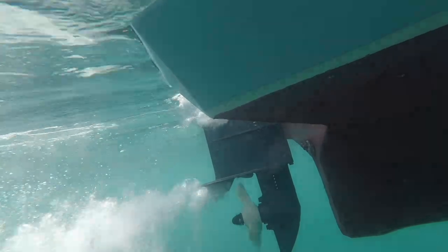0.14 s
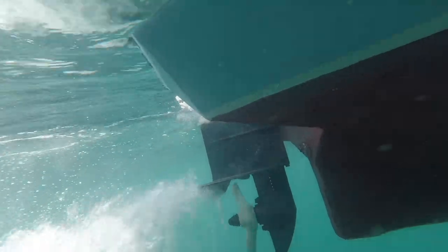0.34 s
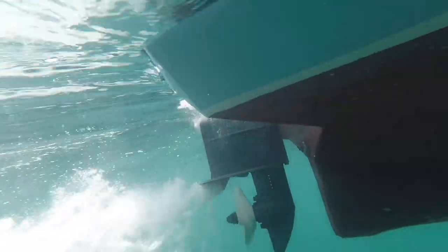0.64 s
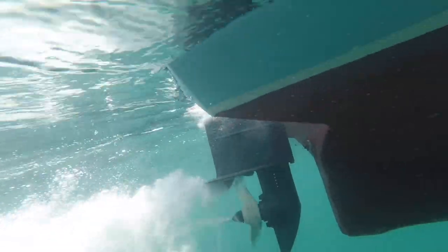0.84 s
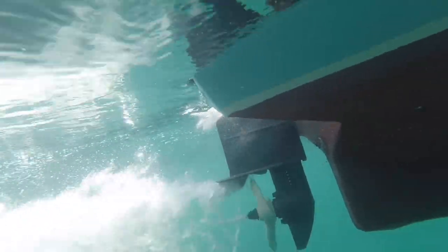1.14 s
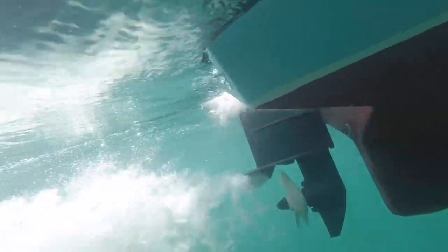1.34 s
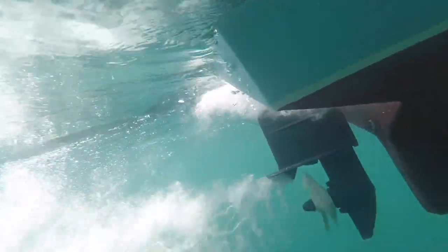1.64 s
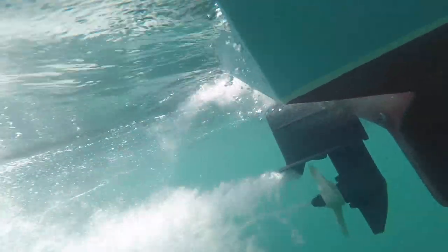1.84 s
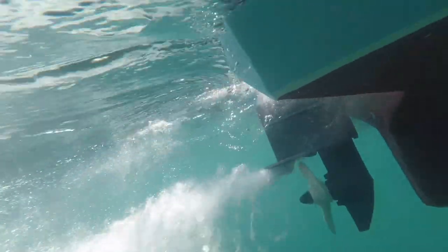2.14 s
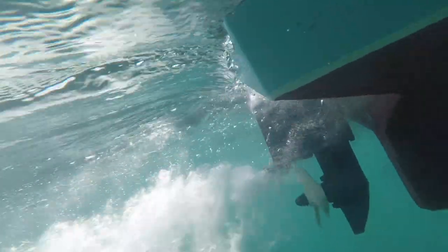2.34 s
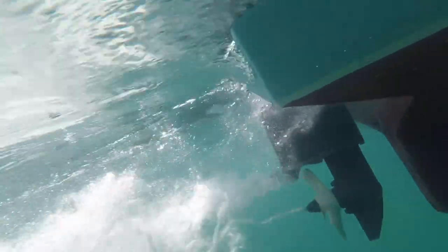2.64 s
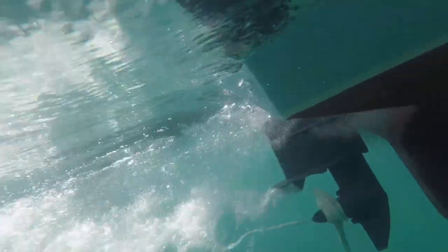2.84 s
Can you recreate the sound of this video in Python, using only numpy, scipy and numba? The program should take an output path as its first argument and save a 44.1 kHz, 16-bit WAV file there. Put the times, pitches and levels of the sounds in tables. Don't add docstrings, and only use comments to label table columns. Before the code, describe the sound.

An outboard motor drones underwater, its muffled throb swelling with bubbling wash, then suddenly slowing down.

```python
import sys
import numpy as np
from scipy import signal
from scipy.io import wavfile
from scipy.ndimage import uniform_filter1d, minimum_filter1d
from numba import njit

SR = 44100
rng = np.random.default_rng(int(sys.argv[2]) if len(sys.argv) > 2 else 0)


def bounce(signal):
    frames = np.transpose(np.atleast_2d(signal))
    limited = np.clip(frames, -1, 1)
    pcm = np.round(limited * 32767).astype(np.int16)
    wavfile.write(sys.argv[1], SR, pcm)


def how_loud(loudness_db):
    steps = np.asarray(loudness_db, float) / 20
    return 10 ** steps


N = 132300
TIME = np.arange(N) / SR


def unit(x):
    return x / np.sqrt(np.mean(x ** 2))


def curve(table, col):
    table = np.array(table, float)
    return np.interp(TIME, table[:, 0], table[:, col])


@njit
def svf(x, hz, width):
    y, b, l = np.empty(len(x)), 0., 0.
    for i in range(len(x)):
        g, k = np.tan(np.pi * hz[i] / SR), width / hz[i]
        v = (b + g * (x[i] - l)) / (1 + g * (g + k))
        b, l, y[i] = 2 * v - b, l + 2 * g * v, k * v
    return y


def ring(x, hz, width_hz):
    hz = hz + np.zeros(len(x))
    return svf(svf(x, hz, 1. * width_hz), hz, 1. * width_hz)


def smooth(x, size):
    return uniform_filter1d(uniform_filter1d(x, size), size)


def walk(rate):
    hold = int(SR / rate)
    steps = np.repeat(rng.standard_normal(N // hold + 1), hold)
    return unit(smooth(steps, hold)[:N])


def band(hz, width_hz):
    edges = np.clip([hz - width_hz / 2, hz + width_hz / 2], 1, SR / 2.2)
    sos = signal.butter(2, edges, "band", fs=SR, output="sos")
    return unit(signal.sosfilt(sos, rng.standard_normal(N)))


def bubbles(table, db, glide, rise, cycles=0):
    out = np.zeros(N)
    for s, peak_db, hz, *own in table:
        start = int(s * SR)
        n = own[0] if own else cycles
        length = min(int(1.6 * n / hz * SR), N - start)
        u = np.arange(length) / SR * hz / n
        shape = (1 - np.exp(-u / rise)) ** 2 * np.exp(-3 * u) * (1 - (u / 1.9) ** 4) ** 2
        tone = np.sin(2 * np.pi * n * u * (1 + glide * u))
        out[start:start + length] += how_loud(peak_db + db) * shape / shape.max() * tone
    return out


# (time [s], cycle rate [Hz])
ENGINE_SPEED = [(0, 22.35), (.16, 22.75), (.4, 23.4), (.64, 24.0), (.9, 24.5), (1.1, 25.15), (1.3, 25.25),
                (2.05, 25.3), (2.3, 24.75), (2.48, 24.8), (2.56, 23.1), (2.72, 18.6), (3, 18.3)]
# (time [s], level [dB])
WASH = [(0, -50.5), (.22, -51.5), (.6, -48.5), (1.0, -46), (1.25, -44), (1.6, -45.5), (1.95, -46.5),
        (2.2, -49.5), (2.55, -52), (2.64, -61), (3, -59.5)]
WASH_REF_DB = -48.5
# (time [s], low mode [Hz], low level [dB], high mode [Hz], high level [dB])
CLOUD_MODES = [(0, 153.9, -9, 160.5, -4.5), (.16, 143.5, -12, 155.3, -9.5), (.33, 147.3, -8, 161.7, -20.5),
               (.48, 123.5, -10, 132, -36.5), (.57, 139, -9, 172.5, -35), (.7, 123.4, -8.5, 175, -14),
               (.9, 130, -13, 169.2, -18), (1.08, 127, -16.5, 157.4, -12.5),
               (1.28, 120.8, -14.5, 155.2, -9.5), (1.48, 126, -38, 151.8, -10), (1.6, 116, -9, 169.7, -14),
               (1.74, 156.1, -10, 179.8, -21), (2.05, 157.7, -16, 172.5, -8),
               (2.32, 142, -10, 163.5, -10.5), (2.46, 152.3, -13, 167.5, -26.5),
               (2.56, 128, -9, 179, -37.5), (2.66, 133, -32.5, 166, -23.5), (2.82, 137, -26.5, 177, -17),
               (3, 152, -37.5, 166.8, -22.5)]
CLOUD_WIDTH_HZ, PUFF_SCATTER_DB, CYCLE_JITTER = 22.9, 1.56, .005
SECOND_PUFF, THROB_HZ, THROB_WIDTH_HZ, THROB_DB = 0.56, 59, 73, -26
SKIRT_HZ, SKIRT_WIDTH_HZ, SKIRT_DB = 233, 260, -33.5
LEAD_S, PUFF_START = .23, .5
WASH_LEAD = .6


def exhaust():
    lead = int(LEAD_S * SR)

    def early(x):
        return np.pad(x, (lead, 0), "edge")

    hz = early(curve(ENGINE_SPEED, col=1) * (1 + CYCLE_JITTER * walk(20)))
    turns = np.cumsum(hz) / SR + PUFF_START
    size = how_loud(PUFF_SCATTER_DB * rng.standard_normal(200))

    def puffs(phase):
        clicks = np.diff(np.floor(phase), prepend=np.floor(phase[0]))
        return clicks * size[phase.astype(int)] * SR / hz / np.sqrt(2)

    def cloud_mode(col):
        drive = first * how_loud(early(curve(CLOUD_MODES, col=col + 1)))
        return ring(drive, early(curve(CLOUD_MODES, col=col)), CLOUD_WIDTH_HZ)

    first = puffs(turns)
    low, high = cloud_mode(1), cloud_mode(3)
    both_cylinders = first + SECOND_PUFF * puffs(turns + .5)
    throb = unit(ring(both_cylinders, THROB_HZ, THROB_WIDTH_HZ)) * how_loud(THROB_DB)
    skirt = ring(ring(first, SKIRT_HZ, SKIRT_WIDTH_HZ), SKIRT_HZ, SKIRT_WIDTH_HZ)
    skirt = unit(skirt) * how_loud(SKIRT_DB)
    load = how_loud(0.78 * (early(curve(WASH, col=1)) - WASH_REF_DB))
    total = low - high + (throb + skirt) * load
    soft = uniform_filter1d(uniform_filter1d(total, size=40), size=32)
    return soft[lead:], turns[lead:] + WASH_LEAD


# (frequency [Hz], density [dB per Hz])
FLOW_SPECTRUM = [(20, -3.5), (90, 7), (200, 0.5), (340, -5), (500, -18.5), (860, -31), (1300, -35.5),
                 (2100, -35)]
FLOW_DB, FLOW_FOLLOWS, FLOW_GRAIN_DB = -19.5, 0.28, 1.5
SHELF_HZ = 2030


def colour_db(hz):
    table = np.array(FLOW_SPECTRUM, float)
    return np.interp(np.log(hz), np.log(table[:, 0]), table[:, 1]) + 10 * np.log10(hz / 340)


def flow(wash_db, turns):
    out, lumps = 0, walk(44.87)
    push_db = 1.4 * np.cos(2 * np.pi * turns)
    for hz in 20 * 2 ** np.arange(0, 7, 1 / 3):
        high = min(hz / 490.0, 1)
        lump_db = high * (FLOW_GRAIN_DB * lumps + push_db + 0.62 * wash_db) + walk(25)
        out = out + how_loud(colour_db(hz) + lump_db) * band(hz, hz / 3.76)
    out = signal.sosfilt(signal.ellip(5, 1, 40, SHELF_HZ, fs=SR, output="sos"), out)
    return unit(out) * how_loud(FLOW_DB + FLOW_FOLLOWS * wash_db)


# (centre [Hz], width [Hz], level [dB], share of the wash change [dB/dB], drift [1/s])
HOUSING_RINGS = [(680, 100, -48, 0.88, -0.023), (1048, 230, -49, 0.5, -0.088),
                 (1930, 130, -56.5, 0.97, -0.0026), (2300, 570, -65.5, 0.65, -0.032),
                 (3250, 2900, -68.5, 0.78, .02), (4906, 2500, -55.5, .9, 0.033),
                 (6070, 1500, -51, 1.1, 0.038), (7670, 1300, -58, 1.7, -0.0022),
                 (8830, 2800, -64.5, 2.7, 0.026)]
BLADE_DEPTH = 0.14


def hiss(wash_db, turns):
    angle = 2 * np.pi * turns
    pulse = np.cos(angle) + 0.83 * np.cos(2 * angle) + 0.77 * np.cos(3 * angle)
    beat = np.clip(1 + BLADE_DEPTH * pulse, .1, 9) * how_loud(0.86 * walk(25) + 0.43 * walk(150))
    out = 0
    for hz, width, db, share, drift in HOUSING_RINGS:
        fizz = beat * how_loud(0.87 * walk(20)) * rng.standard_normal(N)
        centre = hz * (1 + 0.02 * walk(7.5) + drift * (TIME - 1.3))
        out = out + unit(ring(fizz, centre, width)) * how_loud(db + share * wash_db)
    return out


FROTH_PER_S, FROTH_DB, FROTH_CYCLES, FROTH_LOW_HZ, FROTH_OCTAVES = 200, -26, 9, 240, 2.3


def froth(wash_db):
    when, size, loud = rng.random((600, 3)).T
    s = when * len(when) / FROTH_PER_S
    hz = FROTH_LOW_HZ * 2 ** (FROTH_OCTAVES * size)
    peak_db = colour_db(hz) - 2.25 * np.log(loud)
    rows = [row for row in zip(s, peak_db, hz) if row[0] < N / SR]
    return bubbles(rows, FROTH_DB, 0.04, 0.28, FROTH_CYCLES) * how_loud(0.38 * wash_db)


# (time [s], peak level [dB], pitch [Hz], length [cycles])
GURGLES = [(.054, -11.5, 246.3, 8), (.13, -12.5, 342, 8), (0.189, -8.5, 323, 7.2), (.225, -7, 262.2, 12),
           (.364, -19, 241.6, 7), (.437, -7, 234.3, 9), (.56, -11, 328, 7), (.614, -7.5, 277, 7),
           (0.656, 0, 306, 12), (0.716, 4, 320, 5.5), (.78, -10.5, 341, 8), (.825, -6.5, 306, 7),
           (.866, -6.5, 280.6, 9), (.904, -7, 286, 11), (0.987, -18, 280, 6), (1.104, -9.5, 222, 7),
           (1.151, -12, 277, 8), (1.23, -15, 331, 8.1), (1.264, -7, 306, 9), (1.347, -5.5, 344, 8),
           (1.379, -3.5, 346, 9.9), (1.44, -4.5, 342, 9), (1.52, -5.5, 324.6, 10), (1.633, 0, 335.7, 9.3),
           (1.692, -14, 264, 7), (1.785, -3, 318, 6.8), (2.23, -12.5, 307.5, 9), (2.37, -19.5, 301, 7),
           (2.57, -7.5, 296, 7), (2.752, -2.5, 208.3, 7.8), (2.808, -10, 240, 6), (2.645, -16.5, 338.5, 12),
           (2.92, -16, 317, 9), (2.96, -10, 291, 7.9)]


def gurgles():
    return bubbles(GURGLES, -8.5, 0.015, 0.14)


# (time [s], peak level [dB], pitch [Hz], length [cycles])
GLUGS = [(.284, -28, 455, 6), (.338, -28.5, 444, 7), (.45, -28.5, 694, 7.1), (.551, -24.5, 500, 7),
         (.56, -32.5, 655, 16), (.677, -21, 520, 8.5), (.785, -31, 593, 5.3), (.881, -18.5, 463, 3.3),
         (.901, -23, 630, 6.5), (1.03, -33, 670, 14), (1.167, -22, 509, 15), (1.259, -29, 604, 10),
         (1.33, -23.5, 478, 5.3), (1.653, -24, 489, 8.9), (1.799, -22, 479, 6), (1.827, -19, 452, 7),
         (1.869, -20.5, 520, 7), (1.9, -16.5, 466, 4), (1.978, -26.5, 470, 7), (2.057, -24.5, 500, 7),
         (2.1, -27.5, 680, 13.6), (2.23, -15.5, 449, 14.3), (2.495, -29, 520, 4.4), (2.755, -39, 680, 8.6),
         (2.815, -27.5, 487, 14), (2.848, -19.5, 460, 13.6)]


def glugs():
    return bubbles(GLUGS, -1.8, 0.017, 0.075)


# (time [s], peak level [dB], pitch [Hz], length [cycles])
BLIPS = [(1.187, -26.5, 1390, 7.7), (1.477, -19, 944, 11), (1.533, -25.5, 1080, 7),
         (1.56, -25.5, 1010, 3.9), (1.566, -30, 1380, 4), (1.586, -25, 1020, 7.8), (1.592, -28.5, 1330, 11),
         (1.652, -38, 850, 4.4), (1.828, -42, 905, 7.9), (1.887, -25.5, 930, 6.5), (1.912, -23, 924, 5.9),
         (2.555, -27, 820, 12), (2.556, -32, 1330, 4.5), (2.592, -34.5, 805, 6.7), (2.819, -30, 880, 15),
         (2.853, -28, 908, 15), (2.916, -34, 810, 7), (2.875, -36.5, 935, 15), (2.948, -33, 900, 6),
         (2.64, -42.5, 826, 16), (.31, -39, 1113, 10), (.79, -38, 1100, 12), (.836, -30.5, 1040, 8.3),
         (.882, -29, 1040, 9.8), (1.075, -29.5, 1090, 9.2), (1.621, -42, 1165, 6), (1.745, -41, 974, 15),
         (1.858, -30.5, 950, 12), (2.061, -38.5, 960, 8)]


def blips():
    return bubbles(BLIPS, -0.69, 0.075, 0.07)


# (time [s], peak level [dB], pitch [Hz])
TICKS = [(.836, -42, 2460), (.884, -44, 2500), (.922, -43, 2550), (.956, -49, 2500), (.986, -38, 2800),
         (1.331, -32, 2460), (1.348, -36, 2900), (1.359, -39, 2800), (1.368, -39, 2714), (1.376, -44, 2580),
         (1.382, -39, 2700), (1.391, -40, 2500), (1.404, -42, 3200), (1.416, -38, 3000), (1.433, -37, 3100),
         (1.455, -43, 2850), (1.472, -37, 3800), (1.478, -33, 3580), (1.567, -35.5, 3200),
         (1.785, -36.5, 3500), (1.818, -39, 2980), (1.837, -41, 2480), (2.388, -52, 2900),
         (2.402, -50.5, 2900), (2.607, -53, 2800), (2.759, -53, 2800)]


def ticks():
    return bubbles(TICKS, -0.9, 0.013, 0.15, cycles=6.8)


# (time [s], peak level [dB], pitch [Hz], length [cycles])
THUDS = [
    (.895, -16.5, 72.3, 1.6),
    (1.462, -6.5, 50.3, 2.6),
    (1.9, -6.5, 60, 1),
    (2.381, -3.5, 72.2, 2.2),
    (2.6, -4.5, 72.7, 1.4),
    (2.7575, -5, 117.8, 1.6),
    (2.842, -6.5, 111.6, 1.5),
    (2.875, -17, 55.6, 1.6),
]


def thuds():
    return -bubbles(THUDS, -1.4, 0.015, 0.4)


# (time [s], peak level [dB], pitch [Hz], length [cycles])
PINGS = [
    (1.187, -31, 4300, 11),
    (1.471, -30, 4850, 4.9),
    (1.4974, -22, 4500, 10),
    (1.8377, -25, 4430, 13),
    (1.8494, -35.5, 3640, 10.7),
    (1.9102, -25.5, 4500, 11),
]


def pings():
    return bubbles(PINGS, -7.0, 0.016, 0.16)


def scene():
    engine, turns = exhaust()
    wash_db = curve(WASH, col=1) - WASH_REF_DB
    wash = flow(wash_db, turns) + hiss(wash_db, turns) + froth(wash_db)
    water = gurgles() + glugs() + blips() + ticks() + thuds() + pings()
    floor = how_loud(-87.5) * rng.standard_normal(N) + how_loud(-67.0) * band(9700, 3300)
    return (engine + wash + water + floor)[None]


def band_limit(x):
    return signal.sosfilt(signal.butter(12, 11500, fs=SR, output="sos"), x)


LIMIT_DB, LIMIT_S = -1, 0.006
START_S, TOP_HZ = .0006, 10600


def record(dry):
    k = int(LIMIT_S * SR)
    need = minimum_filter1d(np.minimum(1, how_loud(LIMIT_DB) / (np.abs(dry) + 1e-9)), 2 * k)
    x = dry * smooth(need, k)
    x = x * np.sin(np.pi / 2 * np.minimum(TIME / START_S, 1)) ** 2
    x = signal.sosfilt(signal.butter(10, TOP_HZ, fs=SR, output="sos"), x)
    return band_limit(x)


dry = scene()
out = record(dry)
bounce(out)
```